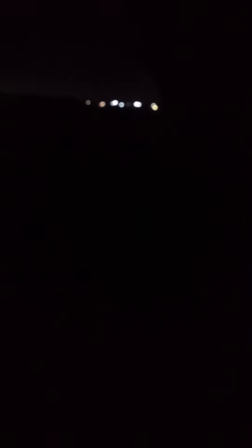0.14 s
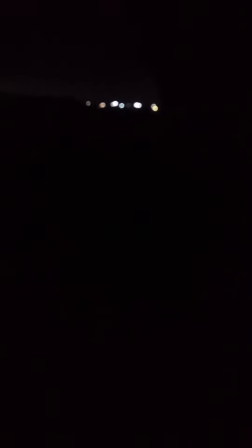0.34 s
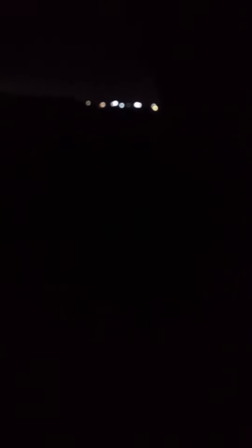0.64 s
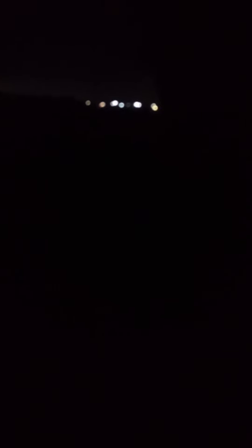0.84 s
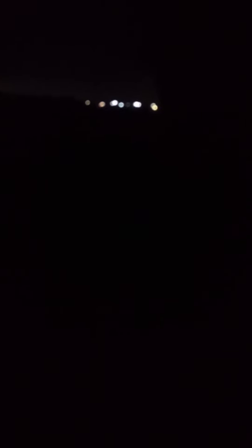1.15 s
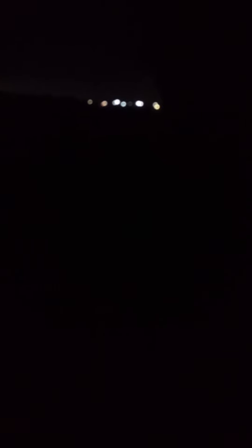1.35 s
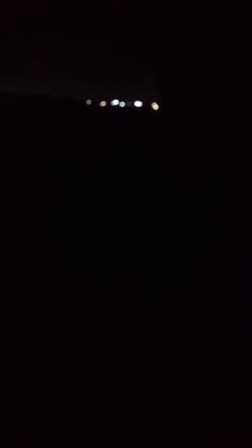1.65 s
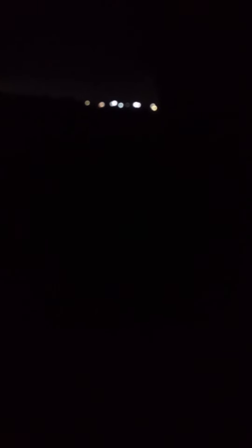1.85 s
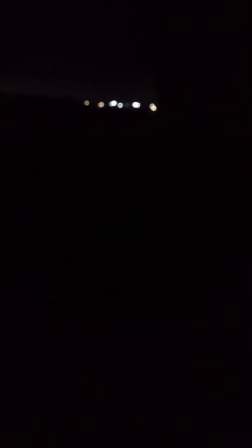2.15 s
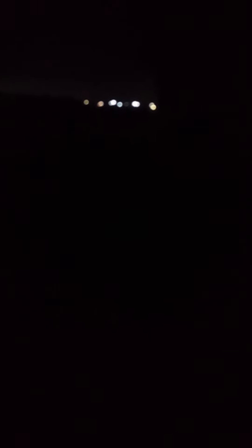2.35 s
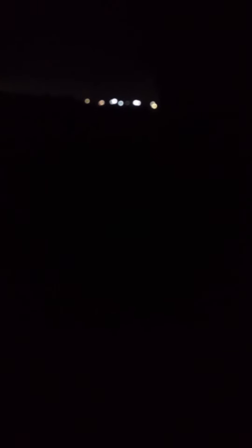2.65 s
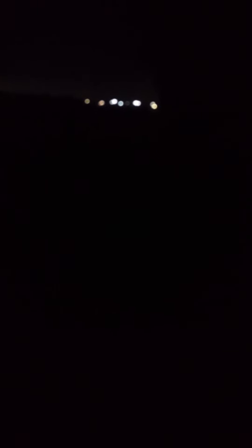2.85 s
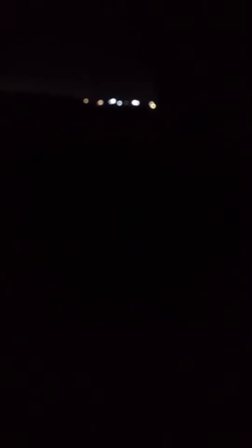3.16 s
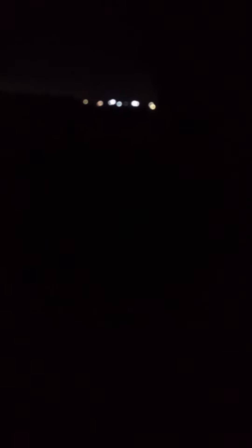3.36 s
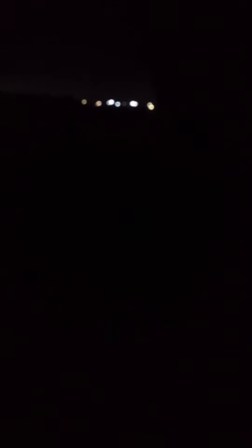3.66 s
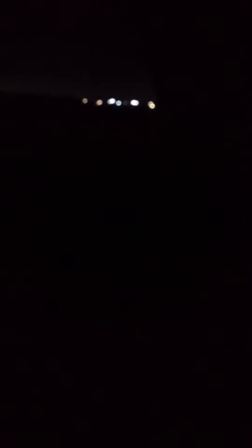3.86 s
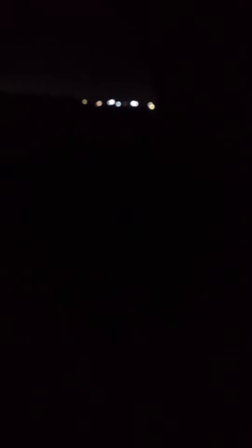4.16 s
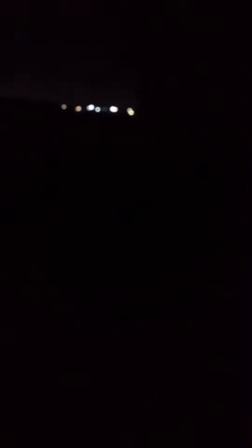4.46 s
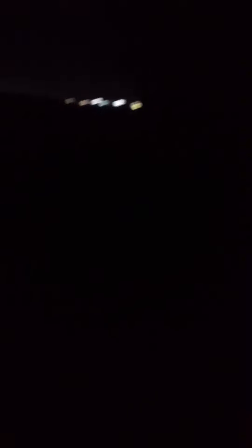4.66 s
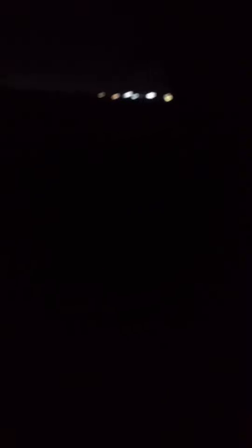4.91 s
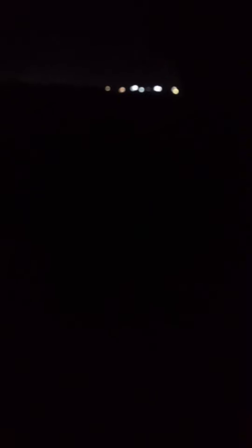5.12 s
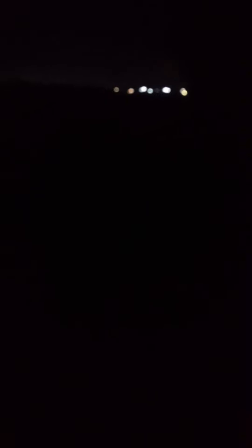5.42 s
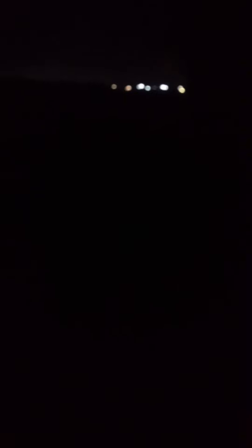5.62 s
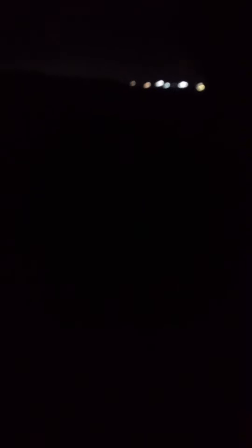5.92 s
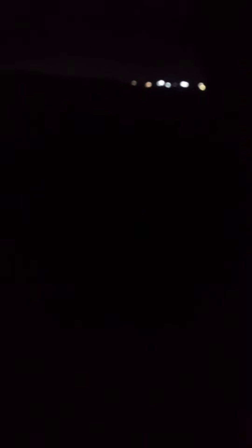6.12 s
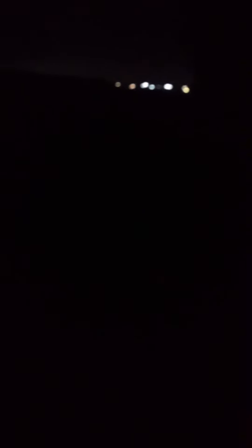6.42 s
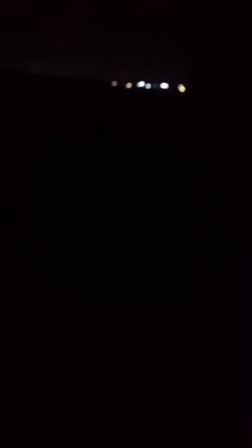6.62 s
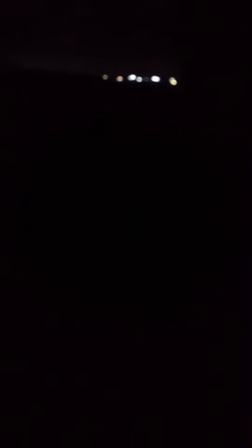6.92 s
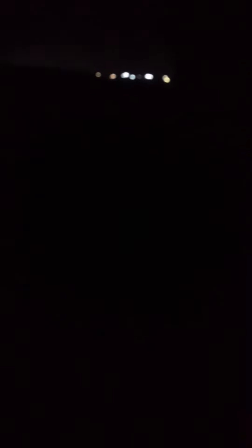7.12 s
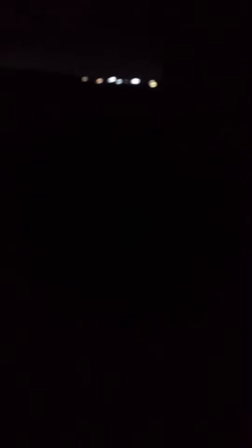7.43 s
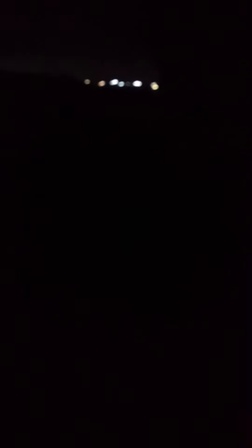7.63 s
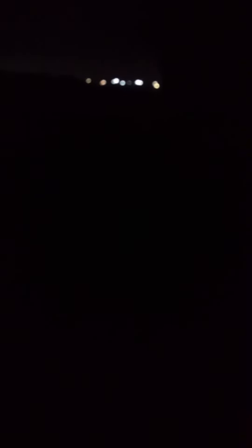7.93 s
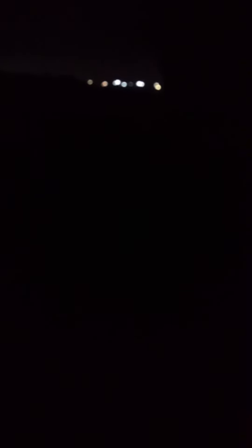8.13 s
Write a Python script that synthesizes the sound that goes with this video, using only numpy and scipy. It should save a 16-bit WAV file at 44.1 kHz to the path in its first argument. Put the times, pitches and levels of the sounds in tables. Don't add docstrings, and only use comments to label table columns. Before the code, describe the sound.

Five tree frogs croak in overlapping turns beside a flooded field at night. Each call is a short, buzzy, rising creak of rapid pulses. The nearest is loud and steady, about two calls a second, with softer ones filling its gaps. Faint crickets shimmer and tick high above, a bush cricket rasps, and light wind thumps low on a hand-held phone.

```python
import sys
import numpy as np
from scipy import signal
from scipy.fft import rfft, irfft
from scipy.io import wavfile
from scipy.ndimage import uniform_filter1d

SR = 44100
rng = np.random.default_rng(int(sys.argv[2]) if len(sys.argv) > 2 else 0)


def store_pcm(level_fs):
    pcm = np.round(np.clip(level_fs, -1, 1) * 32767).astype(np.int16)
    wavfile.write(sys.argv[1], SR, np.atleast_2d(pcm).T)


def invert_db(level):
    return 10 ** (np.asarray(level, dtype=float) / 20)


N = 365148


def unit(x):
    return x / np.sqrt(np.mean(x ** 2))


def hiss(hz, width_hz, order=2):
    band = signal.butter(order, [hz - width_hz / 2, hz + width_hz / 2], "band", fs=SR, output="sos")
    return unit(signal.sosfilt(band, rng.standard_normal(N)))


def walk(rate):
    hold = int(SR / rate)
    steps = np.repeat(rng.standard_normal(N // hold + 1), hold)
    return 1.43 * uniform_filter1d(steps, hold)[:N]


def bump(s, width_s):
    coarse = np.arange(0, N + 64, 64) / SR
    return np.repeat(np.exp(-((coarse - s) / width_s) ** 2), 64)[:N]


def add(out, s, sound):
    i = int(s * SR)
    if 0 <= i < N:
        out[i:i + len(sound)] += sound[:N - i]


def frog(croaks, voice, drift, rate, rise, fade, bend, scatter_db):
    hz, db, ring_ms, sag, late = np.array(voice).T[:, :, None]
    ms = np.arange(int(3.3 * ring_ms.max() * SR / 1000)) / SR * 1000
    shape = 0.51 * np.sin(np.pi * np.minimum(ms / (3.2 * ring_ms), 1) ** rise) ** 2
    low, high = hz < 2200, hz > 3460
    colour_db, detune, jitter = 1.5, 0.008, 0.005
    drift_s, *drift_columns = np.array(drift).T
    out = np.zeros(N)
    for end, peak_db, length in croaks:
        pitch, low_db, high_db = (np.interp(end, drift_s, column) for column in drift_columns)
        chance = rng.standard_normal((40, 2, len(voice) + 1))
        mood = rng.standard_normal((2, len(voice), 1)) * (low | high)
        pitch = pitch * (1 + detune * mood[0])
        gain = invert_db(peak_db + db + low_db * low + high_db * high + colour_db * mood[1])
        for k in range(min(int(length * rate) + 1, 40)):
            left = min((k + 0.5) / (length * rate + 1), 1 - 1e-3)
            opening = min((1 - left) / 0.34, 1)
            effort = np.sin(np.pi / 2 * min((1 - left) / 0.73, 1)) ** late
            tiring = max(1 - fade * max(1 - left / 0.2, 0), 0) ** late
            swell = opening * effort * tiring
            tone_hz = pitch * hz * (1 - sag * left ** bend) * (1 + jitter * chance[k, 0, 1:, None])
            uneven = invert_db(scatter_db * (chance[k, 1, 0] + chance[k, 1, 1:, None]))
            ringing = shape * np.sin(2 * np.pi * tone_hz * ms / 1000)
            pulse = np.sum(gain * swell * uneven * ringing, axis=0)
            add(out, end - (k + 0.02 * chance[k, 0, 0]) / rate, pulse)
    return out


# last pulse in seconds, peak in dB, length in seconds.
NEAR_CROAKS = [(0.1724, -22, .2), (0.668, -22.5, 0.18), (1.1636, -21.5, .2), (1.7162, -21.5, .26),
               (2.1888, -21, .19), (2.7393, -21, 0.2), (3.2519, -22, 0.2), (3.8645, -21.5, .21),
               (4.3905, -22, 0.2), (4.9361, -23, .2), (5.5075, -24, 0.209), (6.0879, -22, 0.21),
               (6.636, -21, 0.19), (7.1573, -21, 0.19), (7.7518, -19.5, .21), (8.2854, -20, .21)]
# pitch at the end in Hz, level in dB, ring in ms,
# share of pitch that sags at the start, lateness of the swell as an exponent.
NEAR_VOICE = [(1380, -10, 2.2, 0.039, 0.31), (1990, -7, 1.98, 0.11, 0.49), (2780, -19.5, 4.1, 0.04, 4.2),
              (3458, 5.5, 2.11, 0.35, 1.28), (3976, -4.5, 1.65, 0.32, 2.5), (4840, -11.5, 1.75, 0.2, 1.1),
              (5090, -18.5, 2.35, 0.098, 1.6), (11460, -30, 1.3, -0.021, 3.5), (10750, -40, 1.6, .02, 4.5),]
# time in seconds, pitch factor,
# low partials in dB, high partials in dB.
NEAR_DRIFT = [(0, 0.94, 1.5, 4.5), (1.7, .97, -0.5, 0.5), (5.401, 0.96, -3.5, 1.5), (6.7, .98, -8.5, -2.5),
              (8.28, 0.98, -6.5, -3.5)]


def near_frog():
    return frog(NEAR_CROAKS, NEAR_VOICE, NEAR_DRIFT, 121, rise=0.53, fade=0.42, bend=2.85, scatter_db=0.18)


# last pulse in seconds, peak in dB, length in seconds.
DEEP_CROAKS = [(0.285, -41, 0.22), (0.8254, -40.5, 0.46), (1.6176, -33, .21), (2.0604, -40.5, 0.19),
               (2.6097, -37, 0.22), (3.1157, -32, 0.16), (3.2266, -35, 0.35), (3.7357, -33, .24),
               (4.6337, -34.5, 0.25), (5.3323, -33, .21), (6.2174, -35.5, .18), (6.7919, -33.5, .22),
               (7.4395, -35, 0.22), (8.1677, -36.5, 0.18)]
# end pitch in Hz, level in dB, ring in ms, share of pitch sagging, lateness exponent.
DEEP_VOICE = [(1508, 9, 2.21, 0.12, 0.36), (2690, -5, 1.34, 0.074, 0.48), (3456, 13.5, 2.11, 0.14, 1.4),
              (3840, 11, 1.7, 0.21, 5.4), (4740, 1, 1.54, 0.12, 1.1)]
# time in seconds, pitch factor, low partials in dB, high partials in dB.
DEEP_DRIFT = [(0, .97, 0.3, -5), (2.4, 0.94, 2.7, -1.5), (3.2, 0.97, -2.8, -7), (8.28, 0.97, -2.5, -4.5)]


def deep_frog():
    return frog(DEEP_CROAKS, DEEP_VOICE, DEEP_DRIFT, 115.5, rise=0.53, fade=0.42, bend=2.6, scatter_db=1.0)


# last pulse in seconds, peak in dB, length in seconds.
SECOND_CROAKS = [(0.1224, -35.5, .3), (0.8038, -31.5, 0.22), (1.2952, -29, 0.25), (1.7949, -27, 0.25),
                 (2.3297, -27, 0.32), (2.8663, -25.5, 0.22), (3.5121, -28, 0.21), (4.1528, -33, 0.26),
                 (4.7206, -33, 0.23), (5.2149, -32, 0.22), (5.7172, -34, 0.23), (6.3432, -30.5, 0.25),
                 (7.1147, -32, 0.26), (7.6126, -32.5, 0.32), (8.1234, -32.5, 0.28)]
# end pitch in Hz, level in dB, ring in ms, share of pitch sagging, lateness exponent.
SECOND_VOICE = [(1303, -2, 3.46, 0.059, 0.27), (1878, -5.5, 2, 0.042, 1.4), (2745, -5.5, 1.42, 0.14, 2.4),
                (3267, 11, 2.2, 0.31, 2.2), (3720, -6.5, 2.95, 0.16, 0.59), (4440, -2.5, 1.95, 0.072, 7.4),
                (5100, -18.5, 2.9, 0.16, 0.31)]
# time in seconds, pitch factor, low partials in dB, high partials in dB.
SECOND_DRIFT = [(0, 0.96, -.6, -4), (2.3, 0.95, 0, 4), (3.9, 0.96, -1, -1.3), (5.4, 0.98, -6.5, -14.5),
                (6.4, 0.96, 1.5, 1.3), (8.28, 0.96, -5.5, -5.5)]


def second_frog():
    return frog(SECOND_CROAKS, SECOND_VOICE, SECOND_DRIFT, 125.5,
                rise=0.46, fade=0.42, bend=2.31, scatter_db=0.62)


# last pulse in seconds, peak in dB, length in seconds.
THIRD_CROAKS = [(0.0711, -23.5, 0.093), (0.6374, -23.5, 0.19), (1.1142, -25, 0.17), (1.6137, -28, 0.13),
                (2.1975, -27, 0.25), (2.7136, -28, 0.21), (3.3413, -24.5, .16), (3.9661, -28, 0.3),
                (4.3074, -31.5, .18), (4.822, -30, .19), (5.3375, -30.5, 0.21), (5.831, -31, 0.23),
                (6.4271, -29.5, 0.36), (6.9759, -26.5, 0.2), (7.4725, -30, .2), (7.8601, -30, 0.25),
                (8.2951, -28, .19)]
# end pitch in Hz, level in dB, ring in ms, share of pitch sagging, lateness exponent.
THIRD_VOICE = [(1140, -3.5, 2.95, 0.081, 1.07), (1747, -10, 2.5, 0.15, 2.1), (2810, -8.5, 2.02, 0.36, 1),
               (3199, 7, 1.9, 0.2, 2.14), (3524, -4, 2.5, 0.021, 1.1), (4316, -1, 1.07, 0.035, 15)]
# time in seconds, pitch factor, low partials in dB, high partials in dB.
THIRD_DRIFT = [(0, 0.99, -1.4, -2), (8.28, 0.98, -2, -1.9)]


def third_frog():
    return frog(THIRD_CROAKS, THIRD_VOICE, THIRD_DRIFT, 125, rise=0.56, fade=0.19, bend=2.12, scatter_db=1.3)


# last pulse in seconds, peak in dB, length in seconds.
FAR_CROAKS = [(0.2692, -34.5, .14), (0.4916, -41, .21), (0.9853, -45.5, 0.28), (1.4966, -46, .14),
              (2.0318, -52, 0.057), (2.9956, -39, 0.85), (3.4148, -32, .17), (3.8632, -35, .21),
              (4.4533, -33.5, 0.17), (4.9821, -36.5, 0.25), (5.4414, -31, .16), (5.9811, -33.5, 0.28),
              (6.5123, -39.5, 0.28), (7.2893, -42, 0.19), (7.9816, -34.5, 0.21)]
# end pitch in Hz, level in dB, ring in ms, share of pitch sagging, lateness exponent.
FAR_VOICE = [(1170, -5.5, 2.7, 0.063, 0.31), (1893, -11.5, 1.53, 0.017, 1.2), (2730, -10, 3.5, 0.24, 0.79),
             (3213, 11, 1.05, 0.22, 1.2), (4650, -13.5, 2.3, 0.048, 5.9)]
# time in seconds, pitch factor, low partials in dB, high partials in dB.
FAR_DRIFT = [(0, 1, -4, -1.7), (4.4, 1, 0.5, -0.32), (5.2, 0.93, 1.1, -0.84), (8.28, 1, 1.7, -1.6)]


def far_frog():
    return frog(FAR_CROAKS, FAR_VOICE, FAR_DRIFT, 126, rise=0.6, fade=0.43, bend=2.2, scatter_db=1.9)


def echoes(x, t60_s):
    s = np.arange(int(2 * t60_s * SR)) / SR
    tail = rng.standard_normal(len(s)) * 10 ** (-3 * s / t60_s) * np.minimum(s / 0.012, 1)
    return signal.fftconvolve(x, tail / np.sqrt(np.sum(tail ** 2)))[:N]


def frogs_over_water():
    near, deep, second, third, far = near_frog(), deep_frog(), second_frog(), third_frog(), far_frog()
    direct = near + deep + second + third + far
    echo_levels_db = (near, -9), (deep, -8), (second, -6.5), (third, -5.5), (far, -4.5)
    close = sum(invert_db(db) * echoes(one, t60_s=0.032) for one, db in echo_levels_db)
    field = invert_db(-19) * echoes(direct, t60_s=0.22)
    sac = signal.butter(8, 920, "high", fs=SR, output="sos")
    frogs = signal.sosfilt(sac, direct + close + field)
    for hz, width_hz in (2260, 93), (4130, 290):
        frogs = frogs - 0.5 * signal.lfilter(*signal.iirpeak(hz, hz / width_hz, fs=SR), frogs)
    return invert_db(-0.1) * frogs


def folded_overtones():
    out = np.zeros(N)
    before = np.arange(-4000, 0) / SR
    for croaks, end_hz, db in (NEAR_CROAKS, 14200, -52), (DEEP_CROAKS, 13900, -40), (SECOND_CROAKS, 13400, -47):
        phase = 2 * np.pi * (end_hz * before - 12000 * before ** 2)
        zip_down = np.hanning(len(before)) * np.sin(phase)
        for end, peak_db, *_ in croaks:
            flutter = 9 * uniform_filter1d(rng.standard_normal(len(before)), size=60)
            add(out, end + before[0], invert_db(peak_db + db) * (1 + flutter) * zip_down)
    return out


def cricket_chorus():
    chorus = invert_db(2.7 * walk(24)) * hiss(6200, 290) + invert_db(-10.5 + 4.1 * walk(14)) * hiss(6450, 220)
    return invert_db(-60.5 + 0.6 * walk(5.5)) * unit(chorus)


def trill(hz, width_hz, rate, sharp):
    turn = 2 * np.pi * np.cumsum(rate * (1 + 0.004 * walk(2.5))) / SR
    return unit(np.exp(sharp * np.cos(turn)) * hiss(hz, width_hz))


def trilling_crickets():
    t = np.arange(N) / SR
    shrill = unit(trill(9240, 280, 61.2, 0.58) + invert_db(-10.0) * hiss(8750, 640))
    out = invert_db(-66 - 0.66 * t) * shrill
    bright_stops_s = 4.26
    bright_on = np.clip((bright_stops_s - t) / 0.03, 0, 1)
    out += invert_db(-70) * bright_on * trill(6850, 380, 59.0, 0.2)
    return out + invert_db(-78.0) * hiss(10550, 1600)


# first tick in seconds, number of ticks, first gap in seconds,
# shortening of each later gap in seconds.
TICK_BOUTS = [
    (4.7203, 1, 0, 0),
    (5.3928, 1, 0, 0),
    (5.8917, 19, .1045, .00116),
    (7.6881, 5, .105, .0034),
]


def ticking_cricket():
    out = np.zeros(N)
    s = np.arange(500) / SR
    stroke = np.hanning(len(s)) * np.sin(2 * np.pi * 8700 * s)
    for first, ticks, gap, quicker in TICK_BOUTS:
        for k, chance in enumerate(rng.standard_normal(ticks)):
            start = first + k * gap - quicker * k * (k - 1) / 2
            add(out, start, invert_db(-61.5 + 2 * chance) * stroke)
    return out


# start in seconds, length in seconds, level in dB.
RASPS = [(-.05, .25, -63), (1.016, 0.21, -68), (1.711, .06, -65), (2.55, 0.23, -62), (3.567, 0.19, -65),
         (4.09, .231, -66), (4.705, .269, -65), (5.713, .28, -64), (6.647, .25, -61), (7.453, 0.19, -63),
         (8.032, .2, -67)]


def bush_cricket():
    s = np.arange(N) / SR
    pause_s = 0.025
    strokes = np.zeros(N)
    for start, length, db in RASPS:
        from_middle = abs(s - start - length / 2)
        strokes += invert_db(db) * (abs(from_middle - (length + pause_s) / 4) < (length - pause_s) / 4)
    strokes = uniform_filter1d(strokes, size=1700) + invert_db(-81 + 2.2 * walk(12))
    scratch = hiss(15200, 800) + invert_db(-21) * hiss(14600, 700, order=3)
    return strokes * unit(invert_db(2.0 * walk(150)) * scratch)


# start in seconds, length in seconds, starting pitch in Hz, starting level in dB.
WHISTLES = [
    (2.405, 1.25, 847, -55.5),
    (6.35, 0.5, 868, -72),
]


def toad():
    out = np.zeros(N)
    sag_hz_per_s, fall_db_per_s = 33, -6
    wavering_db, wobble_hz = 3.5 * walk(30) - 1.5, 6 * walk(14)
    for start, length, hz, db in WHISTLES:
        s = np.arange(int(length * SR)) / SR
        edges = np.clip(np.minimum(s, length - s) / 0.018, 0, 1)
        pitch = hz - sag_hz_per_s * s + wobble_hz[:len(s)]
        level = invert_db(db + fall_db_per_s * s + wavering_db[:len(s)])
        add(out, start, edges * level * np.sin(2 * np.pi * np.cumsum(pitch) / SR))
    return out


# time in seconds, peak in dB, pitch in Hz.
THUMPS = [(0.099, -45, 93.7), (0.202, -42.5, 85.4), (0.396, -40.5, 87), (0.752, -47.5, 62),
          (0.917, -47, 78), (1.101, -46.5, 103), (1.216, -33, 89), (1.312, -35, 95), (1.456, -43.5, 101),
          (1.577, -50, 89), (1.699, -33.5, 94), (2.344, -51, 88), (2.826, -34.5, 106), (3.047, -49, 75),
          (3.151, -35, 106), (3.3, -46, 75), (3.876, -50, 62), (4.1, -49, 70), (4.641, -46.5, 80),
          (4.747, -42, 92), (4.966, -43.5, 73.6), (5.125, -48, 94), (5.282, -51, 83), (5.692, -31.5, 104),
          (5.832, -39, 88), (6.825, -39, 88), (7.243, -39, 110), (7.4, -47, 79)]


def breeze():
    calm_db, gust_below_thump_db, gust_s = -69.5, -21.5, 0.075
    gusts = invert_db(calm_db) + sum(invert_db(db + gust_below_thump_db) * bump(s, gust_s) for s, db, _ in THUMPS)
    rumble = unit(hiss(90.8, 75, order=3) + invert_db(-9.5) * hiss(167, 78))
    out = gusts * invert_db(2.8 * walk(22)) * rumble
    s = np.arange(2200) / SR - 0.018
    for start, peak_db, hz in THUMPS:
        thump = np.exp(-(s * hz / 0.79) ** 2) * np.sin(2 * np.pi * hz * s + 2.0)
        add(out, start, invert_db(peak_db - 1.5) * thump)
    return out


# frequency in Hz, level in dB per Hz.
NIGHT_AIR = [(88, -60.5), (150, -3.5), (334, -13), (854, -66.5), (1310, 0), (1980, -23.5), (2980, 9.5),
             (4240, -9.5), (4670, -18.5), (5150, -7.5), (6770, -30.5), (8070, -28), (9260, -23),
             (12400, -36), (16000, -60)]
# time in seconds, level in dB, length in seconds.
DRONE_SWELLS = [
    (0.297, -73.5, 0.47),
    (1.295, -78, 0.38),
    (5.553, -67, 0.11),
]


def night_air():
    hz, db = np.array(NIGHT_AIR).T
    colour = invert_db(np.interp(np.log(np.fft.rfftfreq(N, 1 / SR) + 1), np.log(hz), db))
    air = unit(irfft(rfft(rng.standard_normal(N)) * colour, N))
    drone = invert_db(-80) + sum(invert_db(db) * bump(s, length) for s, db, length in DRONE_SWELLS)
    return invert_db(-54) * air + invert_db(-80.0) * hiss(560, 580) + drone * hiss(304, 64)


def scene():
    frogs = frogs_over_water() + folded_overtones()
    insects = cricket_chorus() + trilling_crickets() + ticking_cricket() + bush_cricket()
    return (frogs + insects + toad() + breeze() + night_air())[None]


def roll_off(x):
    return signal.sosfilt(signal.butter(12, 17080, fs=SR, output="sos"), x)


def record(dry):
    top = signal.ellip(10, 0.2, 60, 15800, fs=SR, output="sos")
    return roll_off(signal.sosfilt(top, dry))


dry = scene()
out = record(dry)
store_pcm(out)
```